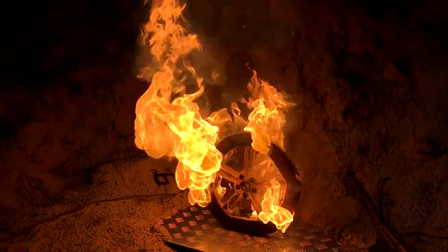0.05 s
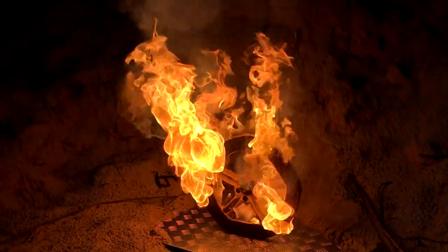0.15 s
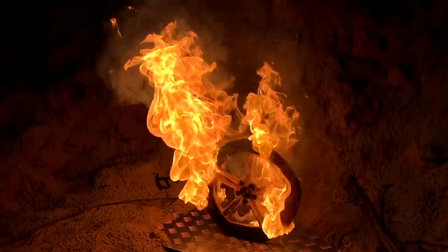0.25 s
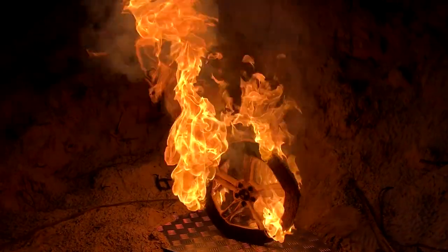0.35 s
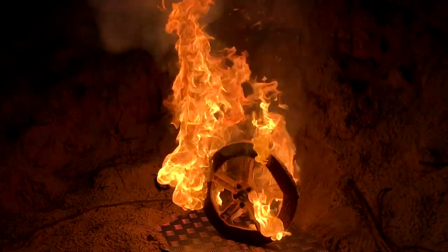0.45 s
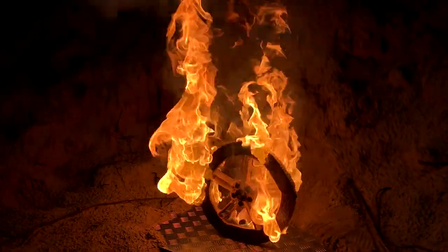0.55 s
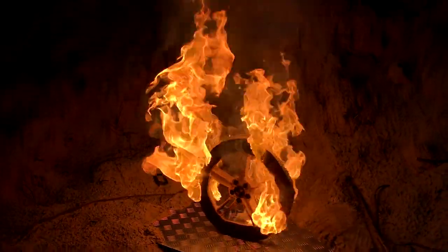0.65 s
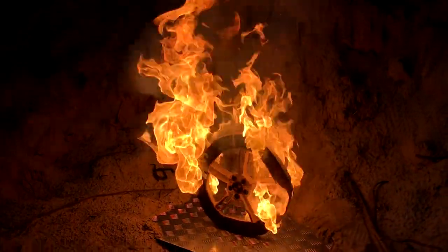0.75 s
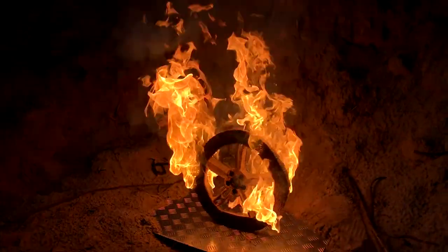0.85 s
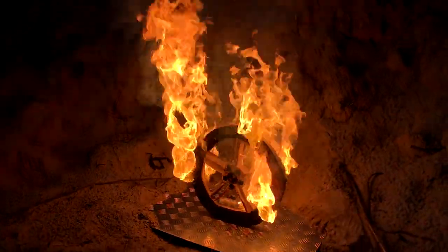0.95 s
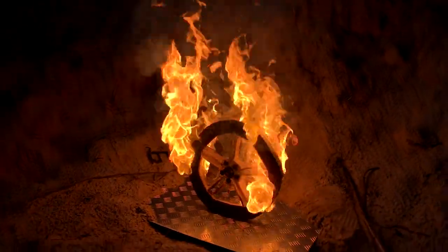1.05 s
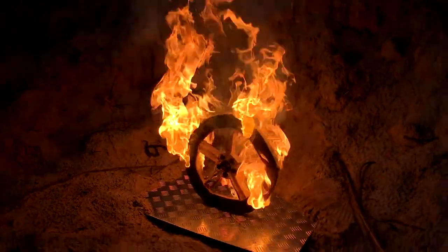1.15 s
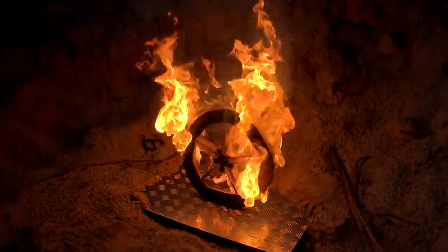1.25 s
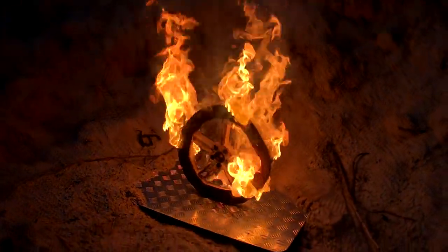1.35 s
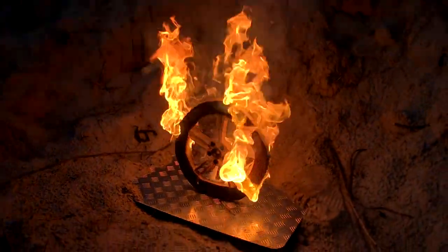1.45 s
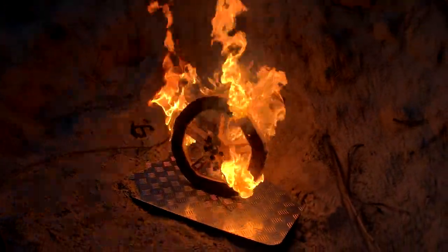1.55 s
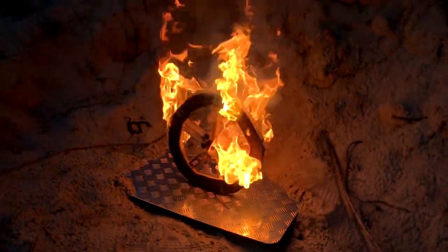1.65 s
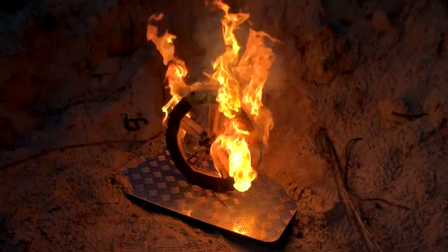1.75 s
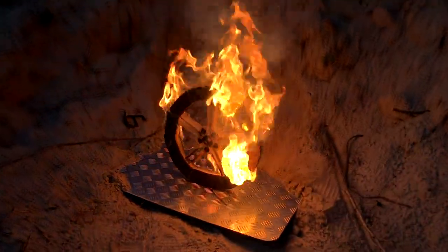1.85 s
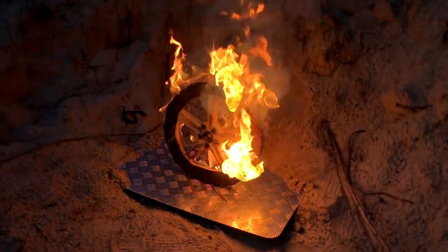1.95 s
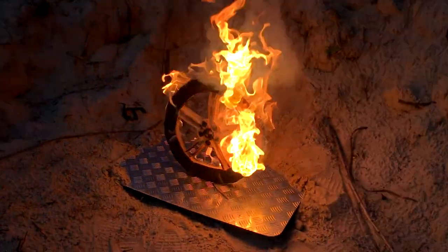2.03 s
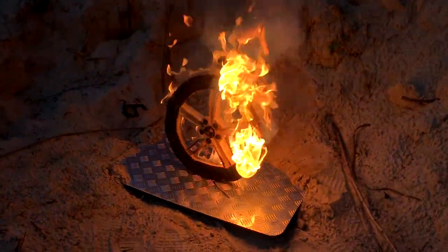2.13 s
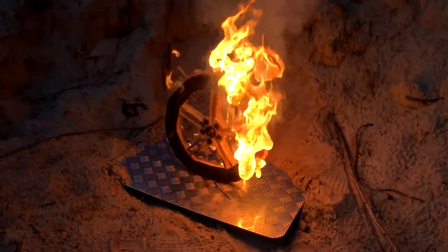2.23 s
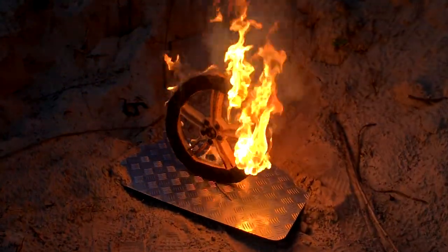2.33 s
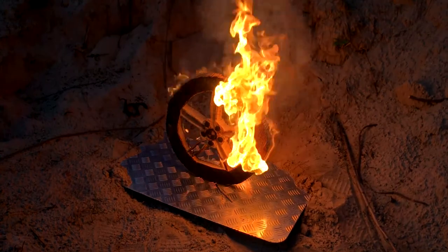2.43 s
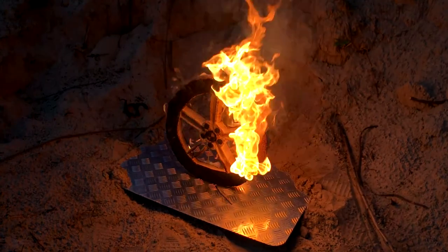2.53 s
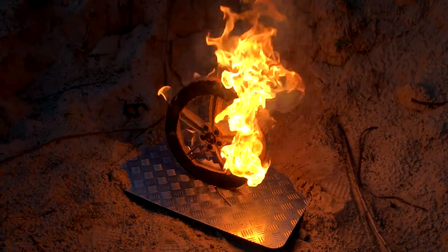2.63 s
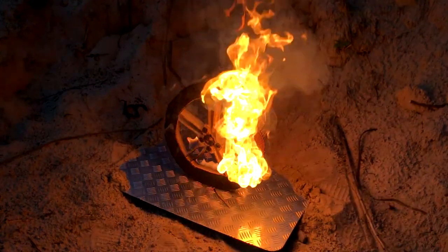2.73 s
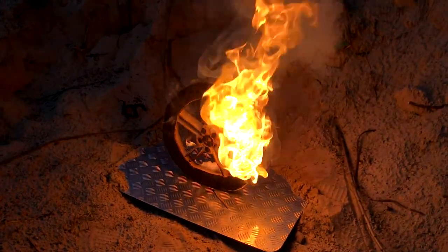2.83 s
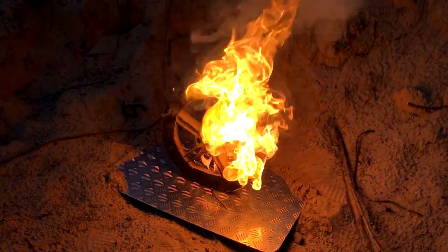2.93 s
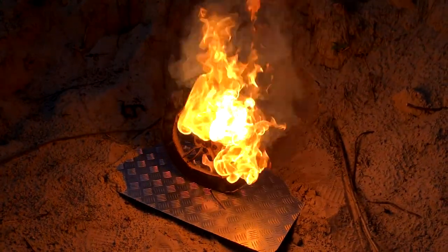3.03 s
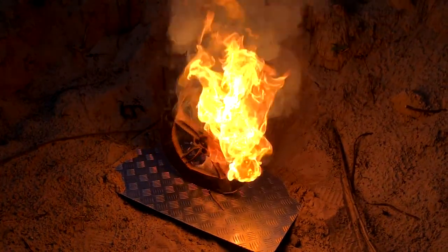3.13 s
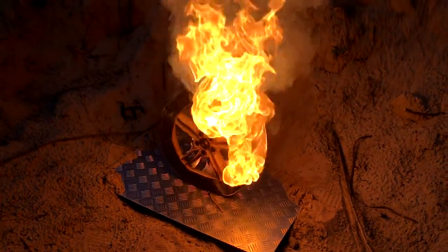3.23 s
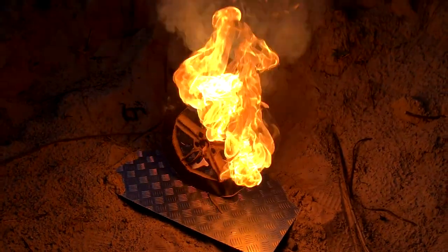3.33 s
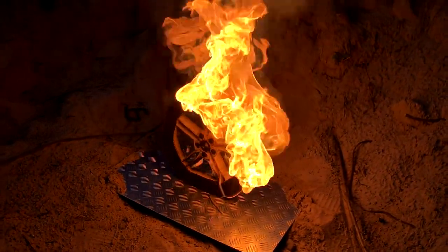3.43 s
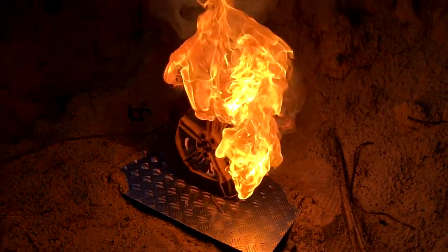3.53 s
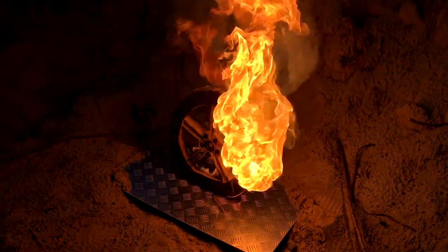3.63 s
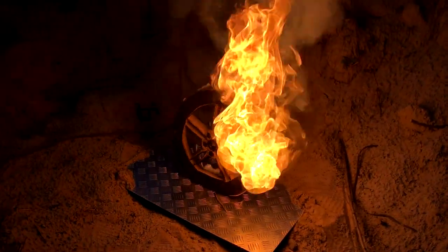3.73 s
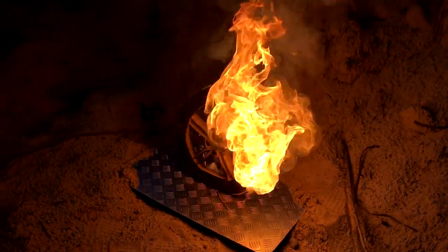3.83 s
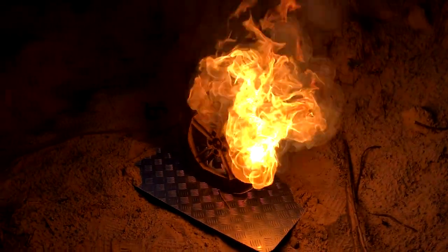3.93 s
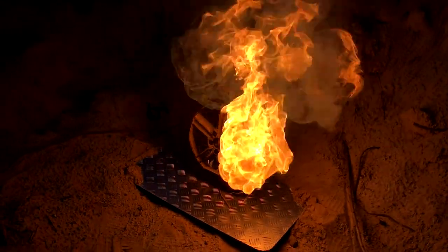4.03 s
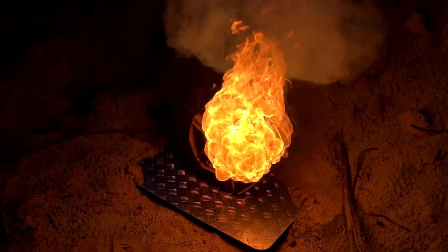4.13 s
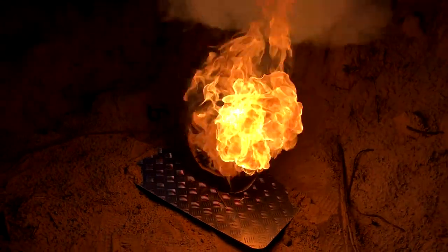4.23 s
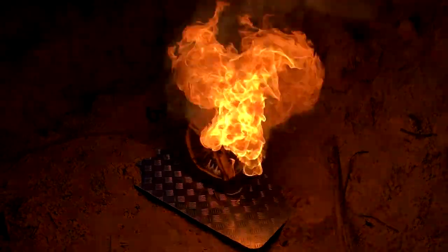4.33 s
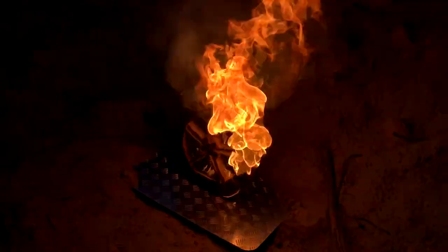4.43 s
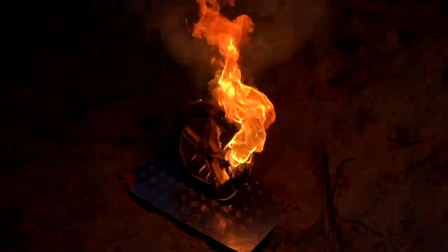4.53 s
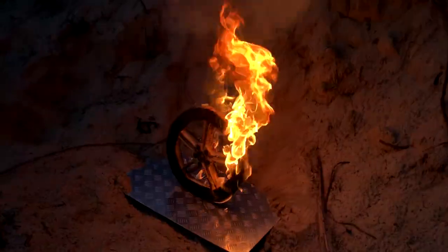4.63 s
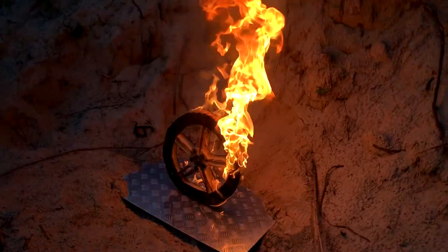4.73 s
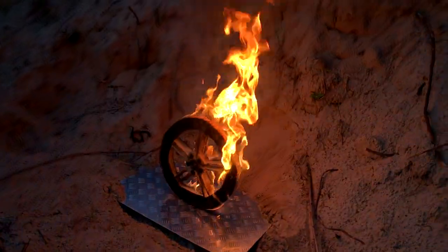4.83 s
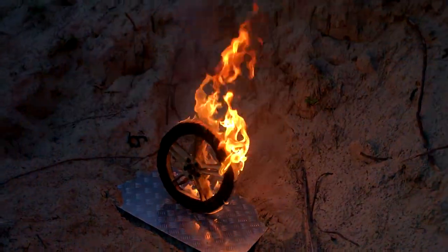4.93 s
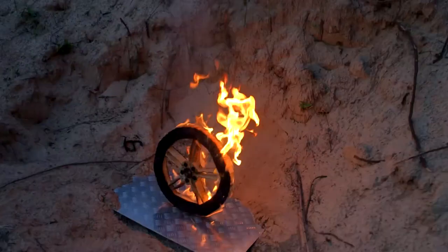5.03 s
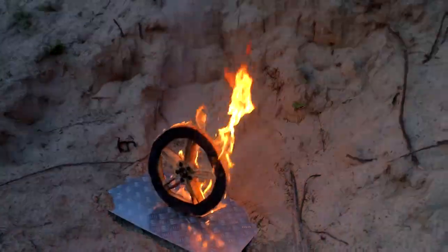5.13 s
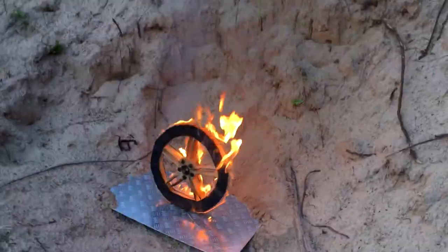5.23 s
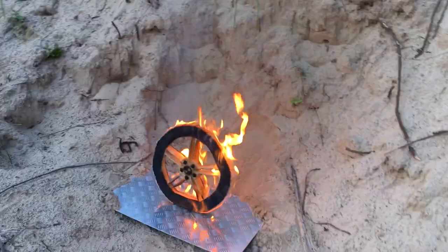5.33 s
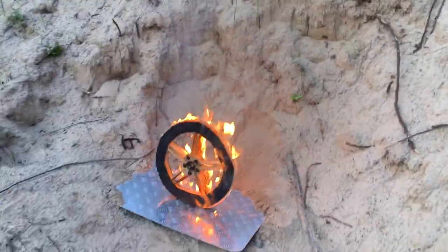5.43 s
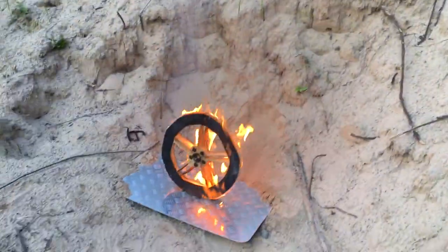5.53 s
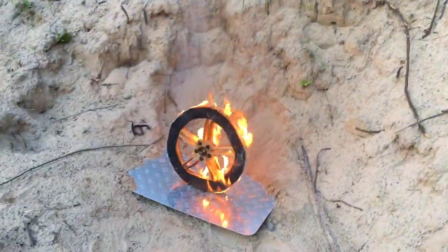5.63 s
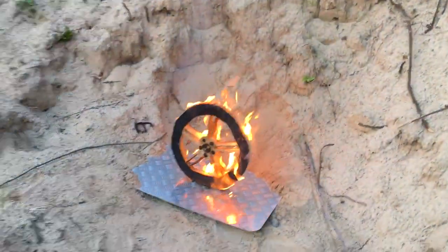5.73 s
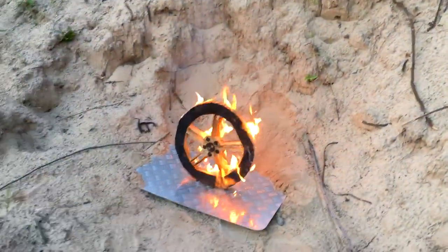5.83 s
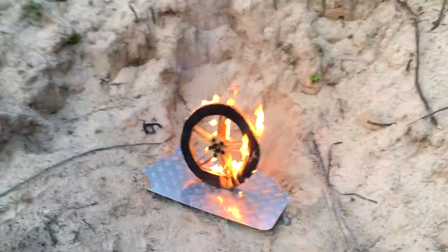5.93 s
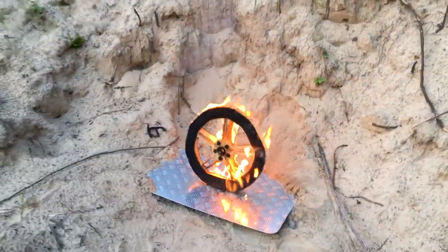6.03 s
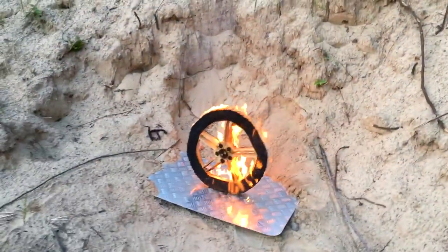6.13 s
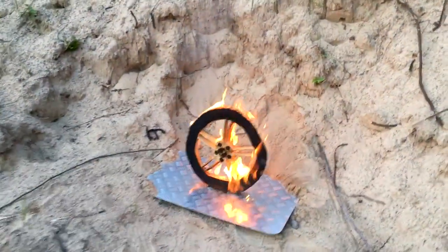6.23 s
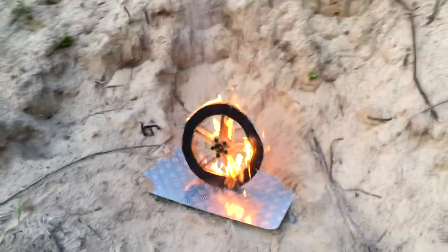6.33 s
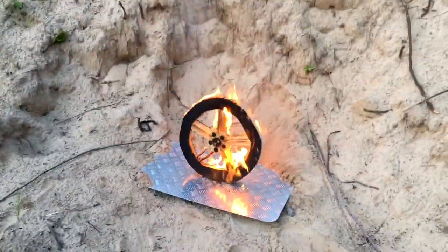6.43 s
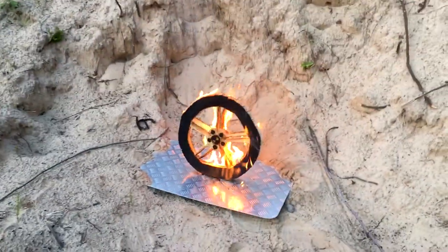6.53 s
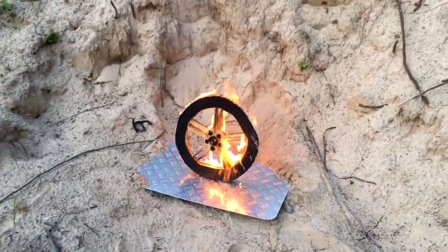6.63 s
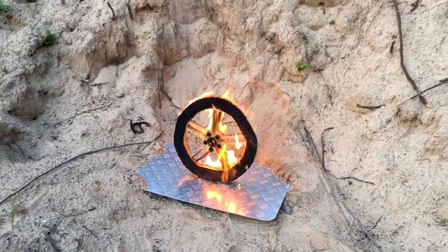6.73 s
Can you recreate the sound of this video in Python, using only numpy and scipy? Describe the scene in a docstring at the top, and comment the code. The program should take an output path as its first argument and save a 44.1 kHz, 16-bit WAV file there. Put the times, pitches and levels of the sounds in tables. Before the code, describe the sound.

From the start, thousands of match heads burn in a dense, grainy, fizzing hiss, with flames rumbling and fluttering underneath in irregular low billows. The hiss eases a little between about 1.5 and 2.5 seconds, with brief flares near 1.3 and 1.8 seconds. From about 2.7 seconds it builds again, sputtering and surging, its tone sweeping with a faint, hollow, wandering howl. Between 4.2 and 4.7 seconds the blaze sinks and the hiss falls away in a few last spurts. From 4.8 seconds the bare wooden sticks tick and snap irregularly, with two tiny, faint, high squeaks just before 5 seconds, a cluster of snaps right after, and the sharpest crack at 5.5 seconds. Crackling continues over a soft smoulder and a weaker rumble until the end, near 6.8 seconds. The fire is outdoors in a sand pit, dry and heard from one point.

```python
"""Thousands of match heads catch one after another as a wheel of matches burns on a plate in a sand pit.
Each head is a tiny jet of gas. Together they rush and fizz, and the hot gas between the rows howls.
Their sound also bounces off the ground, which sweeps the tone as the burning front moves.
Underneath, the rising flames rumble and flutter. After about four and a half seconds the heads
die away and the bare sticks burn on, ticking and snapping."""
import sys
import numpy as np
from scipy import signal
from scipy.fft import rfft, irfft, next_fast_len
from scipy.io import wavfile
from scipy.ndimage import uniform_filter1d, map_coordinates

SR = 44100
rng = np.random.default_rng(int(sys.argv[2]) if len(sys.argv) > 2 else 0)


def wav_out(sig):
    """Save sig, one row per channel (or a flat mono array), as 16-bit PCM at SR to the path in sys.argv[1]."""
    wavfile.write(sys.argv[1], SR, np.round(np.clip(np.atleast_2d(sig).T, -1, 1) * 32767).astype(np.int16))


N = 298987
TOP_HZ = 16300  # where the treble ends
SINK_START_S, SINK_LENGTH_S = 4.24, 0.45  # the blaze sinks as the heads run out

# The tone of each kind of noise. Columns: frequency_hz, relative_db
WOOD_FIRE_TONE = [(200, -10), (330, 4), (700, 13.5), (1050, 10), (1850, -2), (2450, 8.5), (4300, -19),
                  (6500, 2), (9500, 3), (11500, -20), (15800, -3)]  # charring sticks
TICK_TONE = [(700, 7), (2500, 5), (7000, 1), (15800, 1.5)]  # tiny splits in the wood
RUMBLE_TONE = [(12, -30), (22, -12), (32, -3), (42, -1.5), (50, 1.3), (60, -4), (78, -12), (110, -44)]  # the rising column of hot gas
SWIRL_TONE = [(45, -5), (62, 1.5), (78, -3), (97, 0), (112, -10), (135, -10.5), (190, -39)]  # middle-sized swirls in it
FLUTTER_TONE = [(80, -4), (130, -7.5), (155, -1), (205, 0.5), (290, -12), (400, -20.5), (600, -22)]  # tongues of flame
ROAR_TONE = [(200, 2.5), (300, 1.5), (390, 4.5), (470, -3), (620, -8.5), (900, -38)]  # air drawn into the fire
RUSH_TONE = [(300, -29), (470, -14.5), (580, -5), (800, -3.5), (1100, -2.5), (1600, -2.1), (2400, -4),
             (3000, -3.5), (3700, -4), (5000, -10)]  # the middle range of the gas jets
FIZZ_TONE = [(1500, -49), (3200, -10), (3800, -1), (4400, -1), (5100, -2), (5700, -1), (6700, -2),
             (7600, -4), (8500, -3.5), (9600, -10.5), (11000, -15), (13000, -43)]  # their treble
SPRAY_TONE = [(7000, -36), (9500, 0.5), (11200, 2), (13500, 0.5), (15800, -4.5)]  # their very highest hiss

# The roar of the draught that feeds the fire. Columns: time_s, level_db
DRAUGHT_LEVELS = [(0, -45), (.53, -47), (1.15, -55), (1.75, -53), (2.3, -55), (3.65, -51), (4.4, -64.5),
                  (6.2, -67), (6.78, -63)]
# Low swells: billows of flame, and low thuds under two of the loudest snaps.
# Columns: middle_s, half_width_s, rumble_gain_db, flutter_gain_db
LOW_SWELLS = [(0.05, 0.06, -31.5, -39.5), (0.55, 0.063, -29, -58), (0.78, 0.055, -42, -38.5),
              (1.07, 0.028, -31, -41.5), (1.77, 0.018, -36, -36.5), (2.02, 0.03, -33, -51),
              (2.7, 0.029, -36, -43), (3.25, .03, -34, -41.5), (3.94, 0.043, -29.5, -47),
              (4.22, 0.07, -35, -63), (5.05, 0.03, -32.5, -53), (5.51, 0.012, -42.5, -43),
              (6.02, 0.025, -34, -48.5)]

# Two thin, high squeaks. Columns: start_s, gain_db
SQUEAKS = [(4.861, -46), (4.943, -48.5)]
# The tones in each squeak. Columns: pitch_hz, relative_db
SQUEAK_TONES = [(9350, -5), (12170, -2), (12560, -5), (15700, -11)]
# Gas let out by the deepest splits. Columns: start_s, level_db
THUDS = [(5.006, -40), (5.023, -37), (5.053, -34), (5.507, -33)]
# The louder splitting sticks. Columns: start_s, gain_db, low_hz, high_hz (capped at TOP_HZ)
STICK_SNAPS = [(4.799, -26.5, 3900, 15500), (4.8964, -29, 6200, 15500), (4.908, -24, 15000, 16600),
               (4.9554, -33, 3500, 11500), (5.006, -33, 600, 4570), (5.024, -31, 600, 4200),
               (5.047, -41, 1000, 7500), (5.0525, -34, 600, 3000), (5.0533, -25.5, 700, 5200),
               (5.057, -35, 1000, 4500), (5.1859, -31, 1200, 12900), (5.2364, -35, 3220, 10800),
               (5.4108, -27, 900, 15000), (5.5072, -36, 11000, 16300), (5.5076, -16.5, 820, 3500),
               (5.5428, -36, 2000, 7500), (5.6936, -30, 1200, 15100), (5.8142, -40, 4000, 12400),
               (5.83, -34, 1400, 7300), (5.9728, -42, 4500, 14000), (6.0203, -34, 3200, 15500),
               (6.1534, -39, 2000, 9000), (6.037, -39, 4000, 11000), (6.179, -33, 1600, 16100),
               (6.2426, -33, 1800, 13500), (6.273, -36, 8000, 16300), (6.3303, -38, 2400, 9400),
               (6.3698, -41, 11000, 16000), (6.388, -38, 5000, 16000), (6.4395, -34, 1600, 16000),
               (6.534, -39, 1000, 4500), (6.5386, -29, 1200, 10000), (6.6734, -33, 5500, 16300),
               (6.688, -36, 9000, 16000), (6.7295, -37, 1200, 6000), (6.762, -38, 9000, 16000)]

# The bounce off the ground as the burning front moves. Columns: time_s, delay_ms, strength (0 to 1)
FIRST_BOUNCE = [(0.0, 0.67, 0.09), (1.2, 0.66, 0.05), (1.5, 0.5, 0.07), (2.3, 0.52, 0.14),
                (2.58, 0.46, 0.13), (2.7, 0.58, 0.22), (2.8, 0.67, 0.15), (3.05, 0.79, 0.0),
                (3.27, 0.69, 0.09), (3.5, 0.92, 0.08), (3.7, 1.15, 0.11), (3.87, 1.06, 0.12),
                (3.96, 0.91, 0.1), (4.08, 1.11, 0.1), (4.2, 1.41, 0.14), (4.28, 1.38, 0.14),
                (4.37, 1.01, 0.1), (4.52, 1.03, 0.25), (4.62, 1.05, 0.26), (4.74, 0.97, 0.17),
                (4.85, 0.96, 0.16), (5.1, 1, 0.05), (6.78, 0.26, 0.38)]
# The bounce of a second front that runs up the rim. Columns: time_s, delay_ms, strength (0 to 1)
RIM_BOUNCE = [(2.55, 0.87, 0.02), (2.72, 0.89, 0.12), (2.82, 1.16, 0.06), (2.92, 1.27, 0.06),
              (3.02, 1.34, 0.04), (3.18, 1.4, 0.17), (3.3, 0.86, 0.0), (3.45, 0.24, 0.1),
              (3.85, 0.17, 0.01), (4.03, 0.43, 0.04), (4.2, 0.58, 0.0), (4.4, 0.36, 0.36),
              (4.58, 0.75, 0.0), (4.8, 0.89, 0), (4.95, 0.8, 0)]
# Hot gas ringing between the rows of matches, low to high. Columns: time_s, pitch_hz, strength_db
DEEP_HOWL = [(0.0, 710, -1.5), (1.3, 720, -1), (2.2, 750, 6), (2.6, 820, 7), (2.78, 720, 13),
             (3.12, 670, 10.0), (3.3, 696, 6.5), (3.7, 646, 6), (4.3, 700, 9.5), (4.45, 720, 1.5),
             (6.78, 700, 2)]
LOW_HOWL = [(0.0, 1200, 2), (1.15, 1260, 2.5), (1.55, 1160, -1.5), (2.6, 1260, 3.0), (3.35, 1040, 5.0),
            (3.5, 1070, 11.5), (3.72, 1040, 8.5), (3.92, 980, 9), (4.08, 1010, 3), (4.3, 1120, 8.5),
            (4.45, 1170, 7), (5.6, 1130, 4), (6.1, 1100, 6.5), (6.78, 1170, 12)]
MIDDLE_HOWL = [(0.0, 1640, -0.5), (0.35, 1700, -2.0), (0.52, 1730, 5), (0.72, 1580, 1.5), (1.15, 1520, 2),
               (1.4, 1930, 0), (2.45, 1700, 3), (2.85, 1710, 5.5), (3.22, 1350, 3.5), (3.5, 1430, 2),
               (3.72, 1630, 5), (3.93, 1540, 3.5), (4.04, 1850, 4), (4.12, 1540, 10.5), (4.22, 1410, 5.5),
               (4.33, 1320, 11), (4.41, 1620, 1.5), (4.5, 1880, 1.5), (5.1, 2300, 1.5), (5.6, 2550, 6.5),
               (6, 2340, 2), (6.5, 2470, 0)]
HIGH_HOWL = [(2.66, 2970, -2), (2.79, 2730, 3), (2.92, 2390, 8), (3.03, 2110, 5), (3.15, 1980, 0.5),
             (3.5, 2170, 1.5), (3.68, 2100, 5.5), (3.82, 2160, -3), (3.96, 2200, 2), (4.05, 2930, 3),
             (4.15, 2400, 6), (4.23, 2070, 9), (4.35, 2040, -2)]
FIZZ_HOWL = [(0, 7000, 2), (.15, 6700, 3), (.4, 5900, 3), (.7, 5900, 1), (1.2, 5700, 0), (2.5, 5400, 0),
             (2.62, 5200, -3), (2.75, 4680, 5.5), (2.9, 4380, 4.5), (3.05, 4100, 1), (3.25, 5200, 2.5),
             (3.6, 5300, 0), (3.97, 4600, 0), (4.04, 4400, 5), (4.12, 4400, 0), (4.45, 5600, 0),
             (4.55, 5700, 3), (4.8, 6100, 2)]
# A dip in the tone of the whole hiss that comes and goes. Columns: time_s, pitch_hz, strength_db
HISS_HOLLOW = [(0.0, 3050, -4), (1.2, 3140, -4.5), (2.3, 3180, -5), (3.5, 3240, -2.5), (4.0, 3170, 1),
               (4.5, 3130, -5.5), (6.78, 3300, -0.5)]
# Puffs of burning wood gas. Columns: middle_s, half_width_s, gain_db
GAS_PUFFS = [(4.53, 0.046, -52), (5.73, 0.072, -55), (6.62, 0.21, -58)]
# Clumps of heads that flare at once. Columns: middle_s, half_width_s, gain_db
HEAD_FLARES = [(.19, .03, -41), (1.32, 0.019, -37.5), (1.78, .02, -35), (2.84, 0.16, -40),
               (3.78, 0.032, -37.5), (4.04, 0.022, -38), (4.23, 0.027, -42), (4.53, 0.012, -45),
               (4.605, 0.013, -47), (4.763, 0.013, -46), (4.808, 0.02, -47.5), (5.38, 0.05, -57),
               (5.58, .06, -61)]
# The burning heads, until they are spent. Columns: time_s, rush_gain_db, fizz_gain_db, spray_gain_db
HEAD_GAINS = [(0.0, -34, -36, -41.5), (.3, -35, -37, -44.5), (0.4, -37, -37.5, -43.5),
              (0.5, -34.5, -38, -42.5), (0.58, -35, -36.5, -42.5), (0.65, -36.5, -40, -45.5),
              (0.99, -36, -39, -44), (1.65, -42.5, -42, -48.5), (1.78, -38, -38.5, -45),
              (1.87, -42, -41, -49.5), (2.24, -41.5, -41, -52), (2.43, -40, -38.5, -46.5),
              (2.6, -39, -43.5, -50.5), (2.8, -38, -38.5, -46), (2.96, -36, -38, -45.5),
              (3.15, -39, -37.5, -45.5), (3.33, -38.5, -35, -42.5), (3.52, -39, -37, -43.5),
              (3.68, -35.5, -35.5, -42), (3.88, -39, -36, -44), (4.1, -37, -36, -42),
              (4.41, -46, -43, -49.5), (4.52, -46.5, -45.5, -51), (4.69, -53, -51.5, -61)]

# Narrow dips in tone made by the microphone's opening. Columns: centre_hz, half_width_hz, gain_db
MICROPHONE_DIPS = [(7830, 470, -0.5), (4910, 240, -3), (10380, 570, -4)]


def amp(db):
    """Turn decibels into a number to multiply a sound by."""
    return 10 ** (np.asarray(db) / 20)


def unit(x):
    """Scale a sound so that its average strength (rms) is 1."""
    return x / np.sqrt(np.mean(x ** 2) + 1e-20)


def curves(rows):
    """Join a table's rows with straight lines: one curve for each column after the time."""
    times_s, *columns = np.transpose(rows)
    return [np.interp(np.arange(N) / SR, times_s, column) for column in columns]


def wobble(per_s):
    """A smooth curve through per_s random values a second, mostly between -1 and 1."""
    steps = np.arange(0, N, SR // 1000)
    values = rng.standard_normal(int(N * per_s / SR) + 4)
    return np.interp(np.arange(N), steps, map_coordinates(values, [steps * per_s / SR]))


def filtered(x, gain_at):
    """Turn each frequency of a sound up or down by gain_at(hz)."""
    size = next_fast_len(N + SR // 4)
    return irfft(rfft(x, size) * gain_at(np.fft.rfftfreq(size, 1 / SR)), size)[:N]


def coloured(x, tone):
    """Give a sound the tone in a table, at an average strength of 1."""
    points_hz, db = np.transpose(tone)
    gain_at = lambda hz: amp(np.interp(np.log(hz + 1), np.log(points_hz), db, left=-120, right=-120))
    return unit(filtered(x, gain_at))


def noise():
    """Plain, even hiss."""
    return rng.standard_normal(N)


def pops(per_s, spread_db):
    """Tiny clicks of random size at random moments, about per_s a second."""
    clicks = (rng.random(N) < per_s / SR) * np.sign(noise())
    return unit(clicks * amp(spread_db * np.clip(noise(), -2, 2)))


def swells(rows):
    """A smooth rise and fall for each row of middle_s, half_width_s, gain_db."""
    t = np.arange(N) / SR
    return sum(amp(db) * np.exp(-np.minimum(((t - middle_s) / half_width_s) ** 2, 50) / 2)
               for middle_s, half_width_s, db in rows)


def sunk():
    """How far the fire has sunk: 0 in the blaze, 1 when only sticks burn."""
    return np.clip((np.arange(N) / SR - SINK_START_S) / SINK_LENGTH_S, 0, 1)


def embers():
    """Charring sticks burn with a soft rush, small ticks and a few faint crackles."""
    burn = amp(-62) * coloured(noise(), WOOD_FIRE_TONE)
    ticks = amp(-66.5) * coloured(pops(per_s=70, spread_db=4), TICK_TONE)
    crackles = amp(-69.5) * coloured(pops(per_s=7, spread_db=2), TICK_TONE)
    return burn + ticks + crackles


def swelling(steady_db, rows, flicker_db=0.5):
    """A level in dB that flickers a little and rises with each swell in rows."""
    flickering = amp(steady_db + flicker_db * wobble(13))
    return 20 * np.log10(np.hypot(flickering, swells(rows)))


def flames():
    """Rising hot gas rumbles, tongues of flame flutter and the draught roars; all sink with the blaze."""
    blaze_s = np.minimum(np.arange(N) / SR, SINK_START_S)  # rumble and flutter grow until the fire sinks
    rumble_swells = [(s, width, db) for s, width, db, _ in LOW_SWELLS]
    flutter_swells = [(s, width, db) for s, width, _, db in LOW_SWELLS]
    rumble_db = swelling(-39 + 1.38 * blaze_s - 5.5 * sunk(), rumble_swells)
    flutter_db = swelling(-45 + 0.43 * blaze_s - 10.5 * sunk(), flutter_swells)
    plume = coloured(noise(), RUMBLE_TONE)
    surge = np.sqrt(np.abs(uniform_filter1d(plume ** 2, SR // 8)))
    rumble = amp(rumble_db - 1.5) * unit(plume / (surge + 1.2))  # dividing evens out the puffs
    swirls = amp((rumble_db + flutter_db) / 2 - 1.5) * coloured(noise(), SWIRL_TONE)
    late_flicker_db = 1.5 * sunk() * wobble(18)
    flutter = amp(flutter_db - 3 + late_flicker_db) * coloured(noise(), FLUTTER_TONE)
    roar_db, = curves(DRAUGHT_LEVELS)
    roar = amp(roar_db) * coloured(noise(), ROAR_TONE)
    return rumble + swirls + flutter + roar


def squeaks(attack_s=0.001, fade_s=0.16, roughness=1.1):
    """In each squeak, a few unsteady high tones start together and fade quickly."""
    out, t = np.zeros(N + SR), np.arange(SR // 5) / SR
    for start_s, db in SQUEAKS:
        shape = (1 - np.exp(-t / attack_s)) * amp(db - 60 * t / fade_s)
        for pitch_hz, relative_db in SQUEAK_TONES:
            phase = 2 * np.pi * pitch_hz * t + roughness * wobble(410)[:len(t)]
            out[round(start_s * SR):][:len(t)] += amp(relative_db) * shape * np.sin(phase)
    return out[:N]


def thuds(pitch_hz=337, fade_s=0.0089):
    """Gas leaving a deep split gives one short, low knock."""
    out, t = np.zeros(N + SR), np.arange(SR // 10) / SR
    for start_s, db in THUDS:
        knock = amp(db - 60 * t / fade_s) * np.sin(2 * np.pi * pitch_hz * t)
        out[round(start_s * SR):][:len(t)] += knock
    return out[:N]


def snaps(echo_s=0.0068, echo_db=-18):
    """A stick splits with one sharp click, and the side of the pit sends back a faint echo."""
    out, t = np.zeros(N + SR), np.arange(SR // 25) / SR
    for start_s, db, low_hz, high_hz in STICK_SNAPS:
        high_hz = min(high_hz, TOP_HZ)
        tearing = (0.03 + 0.18 * high_hz / TOP_HZ) * amp(-60 * t / 0.009)  # brighter: more fibres tear
        tail = 0.007 * amp(-60 * t / 0.04)
        split = (t == 0) + (tearing + tail) * rng.standard_normal(len(t))
        cut_highs = signal.butter(7, high_hz, "low", fs=SR, output="sos")
        cut_lows = signal.butter(2, low_hz, "high", fs=SR, output="sos")
        crack = signal.sosfilt(np.vstack([cut_highs, cut_lows]), split)
        crack *= amp(db + 0.5) / np.abs(crack).max()
        out[round(start_s * SR):][:len(t)] += crack
        out[round((start_s + echo_s) * SR):][:len(t)] += amp(echo_db) * crack
    return out[:N]


def ground_bounce(x, bounce):
    """A slightly late copy off the ground boosts some pitches and weakens others."""
    delay_ms, strength = curves(bounce)
    dulled = filtered(x, lambda hz: 1 / np.hypot(1, hz / 7000))  # rough sand scatters the treble
    late = map_coordinates(dulled, [np.arange(N) - delay_ms * SR / 1000])
    return (x + strength * late) / np.hypot(1, strength)


def howl(x, track, width_octaves):
    """Ringing gas lifts one wandering band of the hiss; a negative strength hollows it out instead."""
    hz, t, spectrum = signal.stft(x, SR, nperseg=1024)
    times_s, pitch_hz, strength_db = np.transpose(track)
    distance = np.log2((hz[:, None] + 1) / np.interp(t, times_s, pitch_hz)) / width_octaves
    band = np.exp(-distance ** 2) - 0.2  # the rest of the hiss moves a little the other way
    lift_db = np.interp(t, times_s, strength_db, left=0, right=0) * band
    return signal.istft(spectrum * amp(lift_db), SR, nperseg=1024)[1][:N]


def jet_noise(tone):
    """Many tiny gas jets make a grainy hiss, full of little pops."""
    return coloured(noise() + 0.55 * pops(per_s=2500, spread_db=3), tone)


def match_heads():
    """Each head is a sputtering jet; together they rush, fizz and spray, then die down to a smoulder."""
    fall_db_per_s, smoulder_db = (8, 14.5, 8.5), (-68, -62.5, -63.5)  # rush, fizz, spray
    spent_s = np.maximum(np.arange(N) / SR - HEAD_GAINS[-1][0], 0)
    rush_gain, fizz_gain, spray_gain = [
        np.hypot(amp(db - fall * spent_s), amp(rest_db))
        for db, fall, rest_db in zip(curves(HEAD_GAINS), fall_db_per_s, smoulder_db)]
    # Heads catch in clumps, so all three layers sputter together, more so when few are left.
    sputter_db = np.interp(sunk(), [0, 1], [0.26, 1.27]) * wobble(55)
    rush = howl(jet_noise(RUSH_TONE), DEEP_HOWL, width_octaves=0.42)
    rush = howl(rush, LOW_HOWL, width_octaves=0.23)
    rush = howl(rush, MIDDLE_HOWL, width_octaves=0.25)
    rush = howl(rush, HIGH_HOWL, width_octaves=0.13)
    fizz = howl(jet_noise(FIZZ_TONE), FIZZ_HOWL, width_octaves=0.073)
    rush *= np.hypot(rush_gain, swells(GAS_PUFFS)) * amp(1.07 + sputter_db + 0.86 * wobble(32))
    fizz *= np.hypot(fizz_gain, swells(HEAD_FLARES)) * amp(sputter_db + 0.89 * wobble(40))
    spray = spray_gain * amp(1.5 + sputter_db + 1.14 * wobble(60)) * jet_noise(SPRAY_TONE)
    return rush + fizz + spray


def scene():
    """The fire is heard from one point, alike in both channels."""
    hiss = ground_bounce(match_heads(), FIRST_BOUNCE)
    hiss = ground_bounce(hiss, RIM_BOUNCE)
    hiss = amp(-0.54) * howl(hiss, HISS_HOLLOW, width_octaves=0.21)
    fire = hiss + flames() + snaps() + thuds() + squeaks() + embers()
    return np.array([fire, fire])


def record(dry):
    """The microphone's opening cuts narrow dips in the tone, and the treble stops at TOP_HZ."""
    def gain_at(hz):
        dips_db = sum(db * np.exp(-((hz - centre) / width) ** 2) for centre, width, db in MICROPHONE_DIPS)
        return amp(dips_db) / np.hypot(1, (hz / TOP_HZ) ** 120)
    return np.array([filtered(channel, gain_at) for channel in dry])


dry = scene()
out = record(dry)
wav_out(out)
```